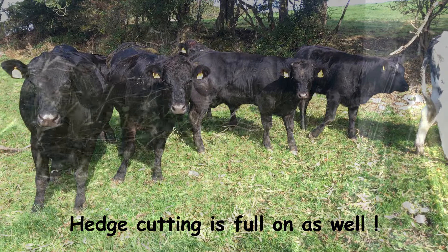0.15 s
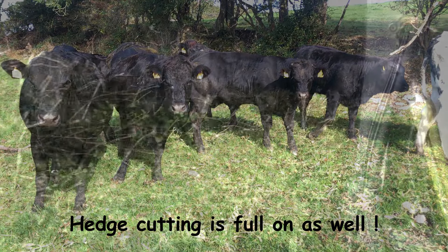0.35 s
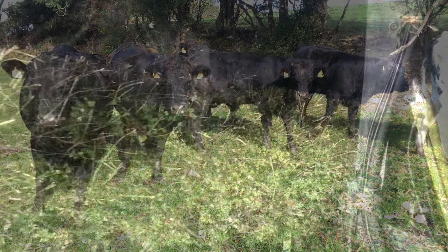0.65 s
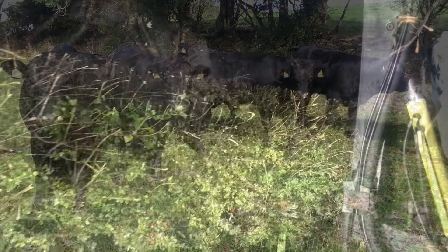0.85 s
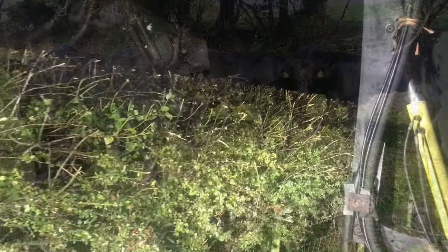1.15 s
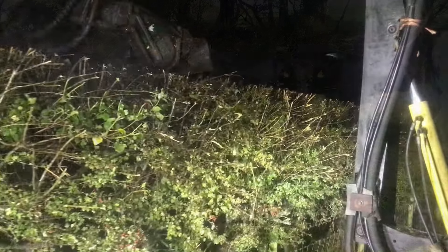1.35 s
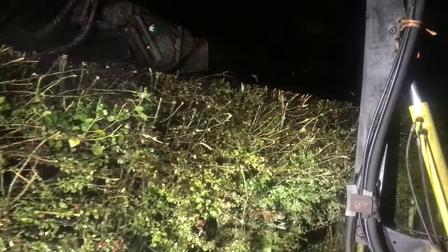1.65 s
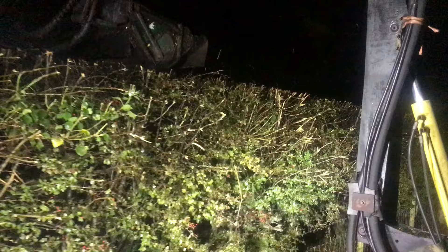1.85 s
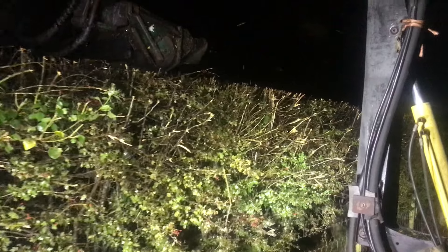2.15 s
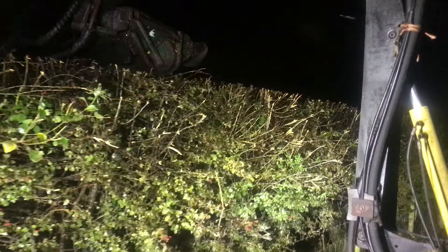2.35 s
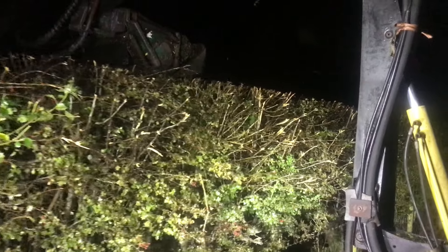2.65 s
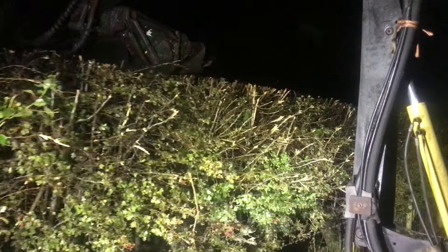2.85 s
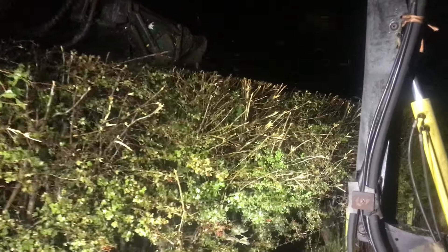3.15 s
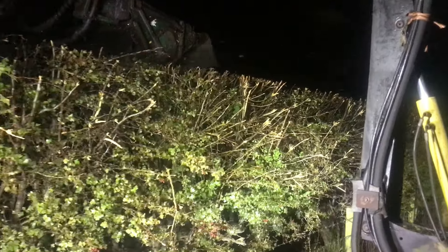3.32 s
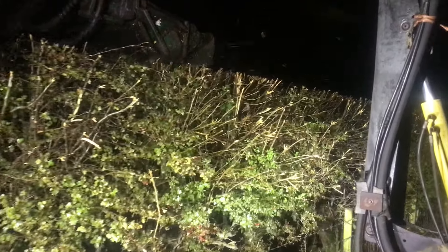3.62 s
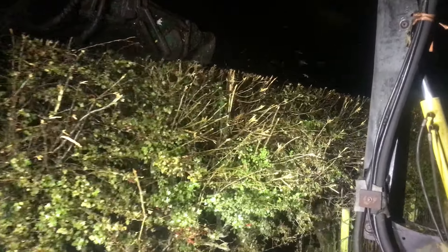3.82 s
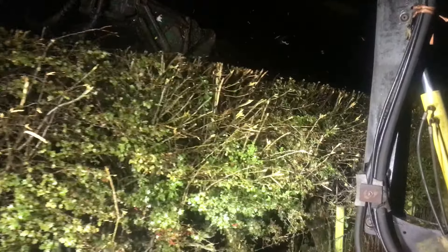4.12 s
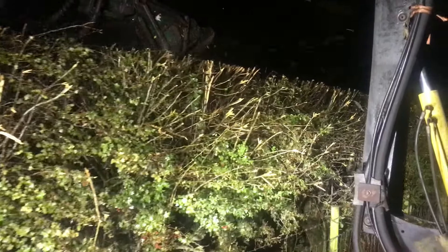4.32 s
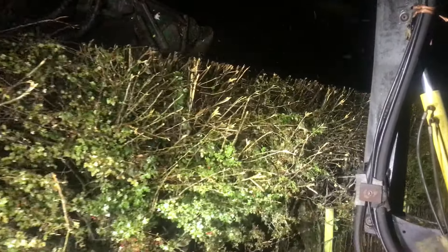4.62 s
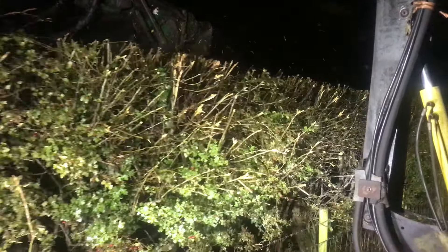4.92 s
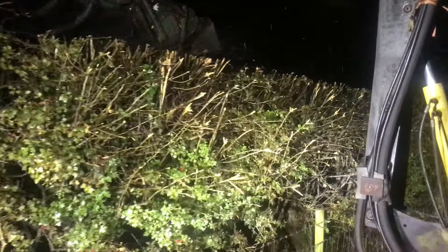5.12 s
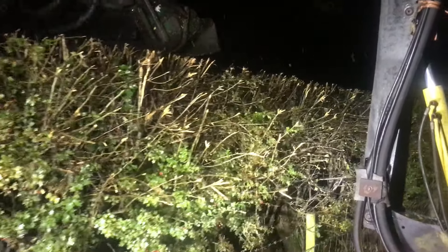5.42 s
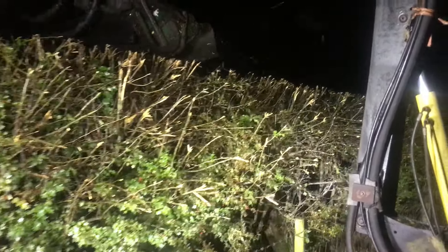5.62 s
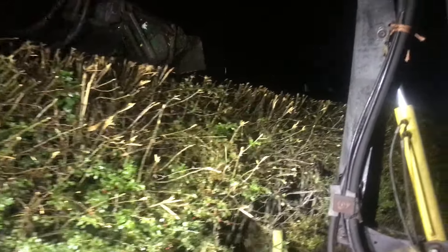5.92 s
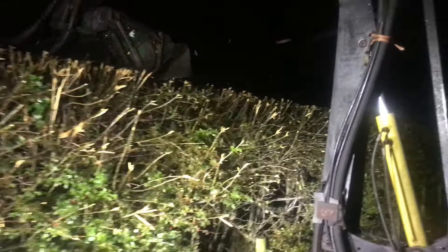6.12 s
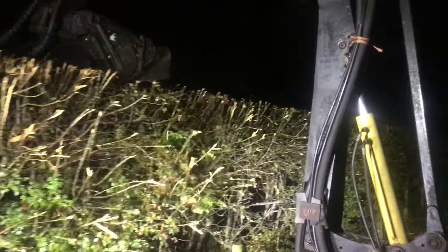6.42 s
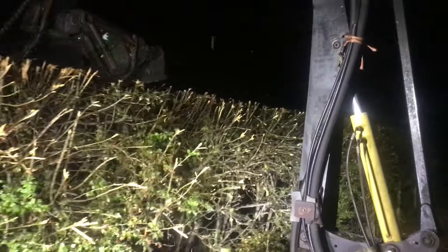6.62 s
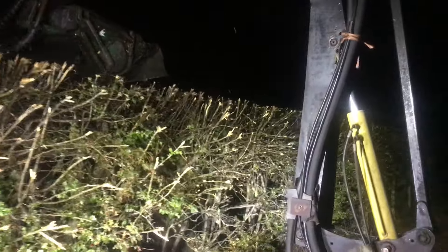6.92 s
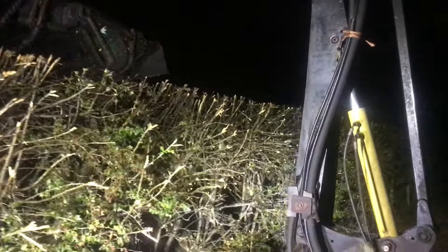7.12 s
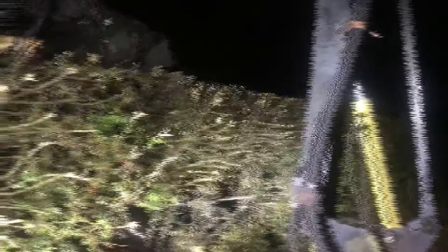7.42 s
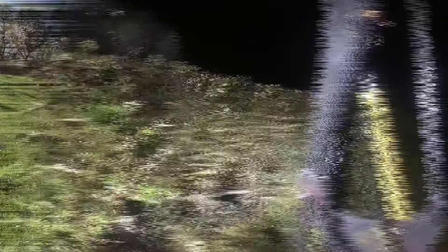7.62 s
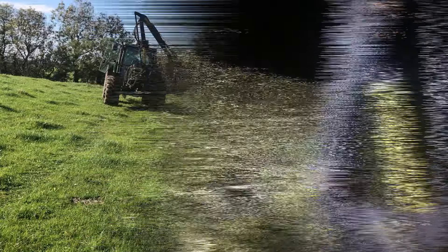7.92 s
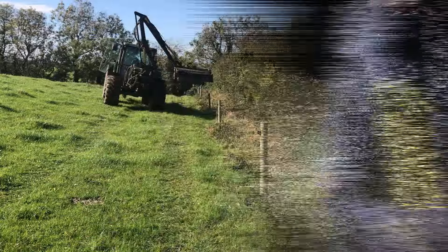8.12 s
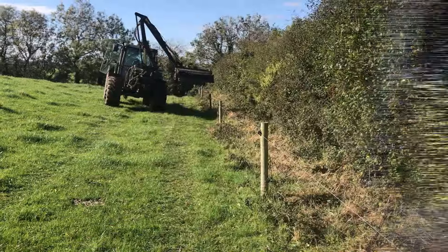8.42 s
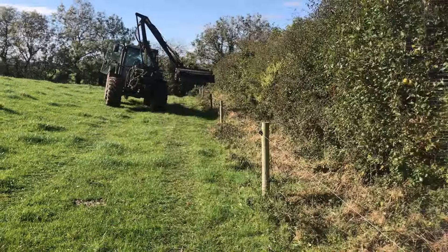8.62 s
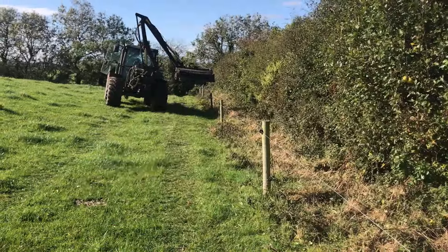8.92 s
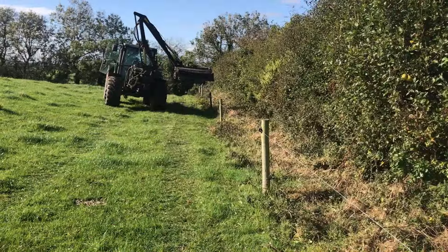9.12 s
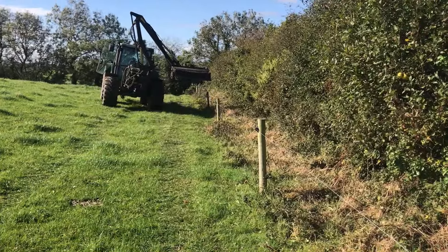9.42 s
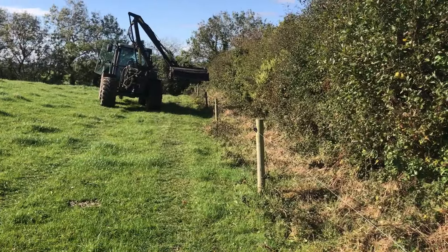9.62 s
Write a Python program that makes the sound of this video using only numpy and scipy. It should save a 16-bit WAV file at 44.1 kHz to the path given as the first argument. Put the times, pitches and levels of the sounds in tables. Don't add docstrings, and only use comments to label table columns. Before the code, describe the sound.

Beside a farm hedge, one microphone close to a working tractor: a deep, beating engine drone, with flail blades ripping through growth. Sparse snaps build into dense crunching and hard woody knocks, then ease to scattered snips. The close noise fades out and a softer, distant diesel takes over outdoors, a quick regular chug with dry clatter and small metallic taps.

```python
import sys
import numpy as np
from scipy import signal
from scipy.fft import rfft, irfft, next_fast_len
from scipy.io import wavfile
from scipy.ndimage import uniform_filter1d, map_coordinates

SR = 44100
rng = np.random.default_rng(int(sys.argv[2]) if len(sys.argv) > 2 else 0)


def int16_out(signal):
    q = np.round(np.clip(np.atleast_2d(signal).T, -1, 1) * 32767)
    wavfile.write(sys.argv[1], SR, q.astype(np.int16))


def rack_gain(trim_db):
    fader = np.asarray(trim_db, float)
    return 10 ** (fader / 20)


N = 430416
TIME = np.arange(N) / SR

# (time [s], low edge [Hz], high edge [Hz], level [dB])
STEREO_FLECKS = [
    (1.072, 5000, 14500, -66),
    (2.188, 6230, 7700, -60),
    (2.866, 11600, 14000, -47),
    (3.842, 7500, 11200, -44),
    (3.843, 4100, 5140, -47),
    (4.3, 10600, 14700, -48),
    (4.975, 6900, 8360, -46),
    (7.996, 13000, 15300, -75),
]
# (time [s], gain [ratio])
CAB_FADER = [(.62, 0.0079), (2.7, 0.88), (5.8, 1), (6.4, 0.77), (7.1, 0.6), (7.5, 0.37), (8.0, 0.18),
             (8.45, 0.069), (8.9, 0.025)]

# (time [s], level [dB])
FAR_LEVEL = [(7.3, -73), (7.8, -76), (8.2, -51), (8.4, -50), (8.7, -48), (9.0, -46), (9.4, -45.5),
             (9.76, -45.5)]
# (multiple of the firing rate [ratio], level [dB])
THUMP_ORDERS = [(1, 3), (2, 8), (3, 7), (4, -1), (5, 2), (6, 1.5), (7, 2), (8, -3)]
# (multiple of the firing rate [ratio], level [dB])
PIPE_ORDERS = [(9, 2.5), (10, 1), (11, 0), (12, -17), (13, -23), (14, 2), (15, -17), (16, -2), (18, -10),
               (20, -3)]
# (frequency [Hz], density [dB per Hz])
CLATTER_COLOUR = [(400, -50), (580, -14), (630, -11), (920, -15), (1550, -12.5), (2500, -21.5), (3000, -29),
                  (3900, -58)]
# (frequency [Hz], density [dB per Hz])
HISS_COLOUR = [(2000, -34), (2800, -17), (3300, -6), (4200, -11), (6000, -10.5), (9000, -15), (11000, -23),
               (13000, -45), (16000, -60)]
# (frequency [Hz], density [dB per Hz])
PANEL_COLOUR = [(40, -60), (100, -11), (150, -3.5), (310, -2), (390, -4), (450, -1.5), (560, -13),
                (700, -53)]
# (frequency [Hz], density [dB per Hz])
TOP_TREBLE_COLOUR = [(8000, -60), (10000, -4), (12000, 0), (13500, -5), (15500, -8), (17000, -60)]
# (frequency [Hz], width [Hz], level [dB])
BONNET_RESONANCES = [(1070, 20, 7.5), (1590, 83, 1.5), (2370, 200, 0.5), (3650, 100, 8.5), (4880, 280, 6)]
# (time [s], peak level [dB])
TAPPET_KNOCKS = [(8.4032, -40), (8.5888, -46), (8.7484, -35), (8.8761, -40), (8.938, -49), (9.0004, -50),
                 (9.0634, -47), (9.0946, -41), (9.3491, -37), (9.4429, -47), (9.5036, -42), (9.5321, -39),
                 (9.6264, -55), (9.6593, -46)]

# (time [s], level [dB])
SQUEAL_LEVEL = [(8.11, -91), (8.15, -72), (8.19, -84), (8.23, -86), (8.27, -86), (8.45, -94.5)]

# (time [s], firing rate [Hz])
FIRING_RATE = [(.9, 42.7), (1.5, 42.76), (1.8, 42.61), (2.1, 42.2), (2.7, 42.92), (3.0, 42.77),
               (3.45, 42.3), (3.9, 42.16), (4.5, 42.22), (5.25, 41.87), (5.7, 41.96), (6.3, 42.7),
               (6.6, 42.76), (6.9, 42.62), (7.5, 42.8), (8.4, 42.82)]
# (multiple of the firing rate [ratio], level over the drone [dB])
FIRING_ORDERS = [(3, -3.5), (4, -8.5), (5, -14.5), (10, -7.5), (11, -11.5), (12, -11.5), (13, -15.5),
                 (14, -16), (15, -24), (19, -24), (24, -29)]
# (multiple of the firing rate [ratio], level over the drone [dB])
UNEVEN_ORDERS = [(2.663, -16), (3.263, -10.5), (3.56, -25), (4.203, -12.5), (4.536, -14.5), (4.78, -24),
                 (5.67, -17), (10.33, -14), (6.56, -20), (3.766, -8), (28, -14)]
# (frequency [Hz], density [dB per Hz])
BLOCK_COLOUR = [(29, -29), (50, 1), (86, -9.5), (150, -0.5), (225, -6.5), (318, -9.5), (371, -11),
                (433, -6.5), (687, -12), (742, -14), (900, -13), (1220, -11.5), (1600, -18), (5000, -37),
                (6500, -63), (11000, -120)]
# (frequency [Hz], width [Hz], level [dB])
CAB_RESONANCES = [(287, 21, 4), (746, 23, 7), (1027, 19, 5.5), (1180, 95, 2.5), (1475, 17, 5.5),
                  (2120, 240, 3.5), (2245, 28, 5), (2890, 230, 4), (4110, 410, 2.5), (4960, 180, -5),
                  (5390, 200, 0.5), (6330, 160, 1), (7700, 170, -6), (9400, 400, 1), (10460, 150, -5.5)]
# (time [s], rotor share [0-1], engine load [dB])
ROTOR_BEATS = [(.83, 0.6, 0.5), (1.75, 0.2, -5.5), (2.25, 0.26, 3.5), (2.93, 0.1, 1.5), (3.46, 0.3, 1),
               (3.9, 0.26, -0.5), (4.36, 0.35, 0), (4.87, 0.24, 3), (5.5, 0.1, 2.5), (6.69, 0.54, -0.5),
               (7.65, 0, 2.5), (8.4, 0, -3), (9.5, .2, -4)]
# (time [s], loss [dB])
BOOM_JOLTS = [
    (1.13, 1),
    (2.87, 7),
    (3.01, 10),
    (5.38, 7),
    (5.58, 1),
    (5.79, 5),
]
# (time [s], second order level [dB], upper orders level [dB])
ENGINE_STRAIN = [(.8, -4, -1.5), (1.5, 2.5, -1), (2.0, -1, 0), (2.6, -11, -2.5), (3.0, -1, -0.5),
                 (3.6, 0, -2), (4.0, 0, 0), (4.5, 0.5, -0.5), (5.5, -1, -0.5), (6.4, 3.5, -2),
                 (7.0, -3, -1.5), (7.6, 5.5, -2), (8.2, -1, -1.5)]
# (time [s], pitch [Hz], level [dB])
PUMP_WHINE = [(.7, 748, -66), (1.1, 748, -55), (1.6, 745, -50), (2.1, 737, -48), (2.6, 745, -46),
              (2.95, 744, -45), (3.3, 733, -43), (3.65, 731, -44), (4.2, 740, -46), (4.7, 740, -46),
              (5.2, 738, -46), (5.7, 735, -47), (6.3, 742, -45), (7.0, 741, -45), (7.6, 744, -51),
              (8.3, 746, -61)]
# (time [s], level [dB])
PUMP_ORDER_LEVEL = [(.8, 0.5), (2.0, 3), (2.8, -4), (4.0, 0), (4.8, 1), (5.5, -10), (6.2, 0.5), (6.8, 0.5),
                    (8.0, -2)]

# (time [s], level at full fader [dB])
GROWTH_FEED = [(.62, -35.5), (.9, -43.5), (1.3, -42.5), (1.55, -47.5), (1.68, -47.5), (2.05, -46),
               (2.36, -48.5), (2.42, -41), (2.75, -42.5), (3.2, -39.5), (3.55, -31), (3.72, -36),
               (3.95, -36), (4.1, -40), (4.85, -38.5), (5.05, -40), (5.15, -54.5), (5.56, -42.5),
               (5.8, -51.5), (6.42, -51), (6.6, -48), (7.6, -46), (7.77, -47.5), (7.85, -55)]
# (time [s], half length [s], loss [dB])
GROWTH_GAPS = [
    (1.6, .03, 0.5),
    (1.705, .018, 8),
    (2.265, .035, 5),
    (3.748, .012, 4),
    (4.13, .025, 1),
    (4.32, 0.01, 1),
    (7.55, .012, 6),
    (7.728, .012, 4),
]
# (time [s], peak level [dB], stalk crack [dB])
STALK_BITES = [(0.9981, -44, -11), (1.0939, -39, -7), (1.1922, -37, -17), (1.289, -35, -14),
               (1.3259, -31.5, -16), (1.4292, -31, -19), (1.4775, -39, -17), (1.652, -39, -11),
               (1.727, -33.5, -15), (1.8502, -34, -19), (1.8961, -35, -15), (1.9555, -35, -11),
               (2.0014, -34, -15), (2.025, -32, -11), (2.118, -34, -11), (2.371, -33, -11),
               (2.3846, -22, -14), (2.4818, -24.5, -11), (2.5177, -29.5, 0), (2.7164, -31, -6),
               (2.7634, -28, 2), (2.8504, -35, -11), (2.9003, -21, -18), (2.9472, -22, 2),
               (3.1614, -23, -7), (3.2415, -19, -18), (3.3712, -20, -12), (3.4194, -18, -13),
               (3.4466, -14, -23), (3.4954, -21, -11), (3.8484, -28, 6), (3.8834, -22, -3),
               (4.1754, -22, -6), (4.4234, -27, -11)]
# (time [s], peak level [dB], stalk crack [dB])
SHOOT_SNIPS = [(4.6524, -26, -16), (5.0554, -27, -9), (5.1053, -27.5, 1), (5.279, -27.5, -7),
               (5.3514, -35, 0), (5.3991, -36, -6), (5.5104, -22.5, -17), (5.8634, -38, -10),
               (5.9299, -30, -6), (5.9854, -33.5, -10), (6.1345, -31, -16), (6.2282, -30, -6),
               (6.312, -26.5, -1), (6.345, -31, -6), (6.392, -31, 1), (6.463, -37, -10), (6.4754, -40, -11),
               (6.5784, -32, -6), (6.6544, -29.5, -16), (7.0414, -31, -14), (7.1077, -32, -13),
               (7.166, -35, -12), (7.1746, -27, -20), (7.2154, -31, -20), (7.3274, -37, -6),
               (7.3714, -38, 3), (7.4304, -36, 0), (7.5004, -40, 2), (7.5637, -37, -10), (7.6011, -34, -21),
               (7.6715, -38, -7), (7.694, -41, -10), (7.7393, -49, -14), (8.0441, -47, -10),
               (5.425, -32, -1), (5.452, -33, -2)]
# (time [s], half length [s], level [dB])
THICK_BRANCHES = [(1.283, .06, -53), (1.716, 0.077, -50), (2.458, 0.06, -35.5), (2.728, 0.042, -31),
                  (2.814, 0.021, -27), (2.858, 0.034, -24), (2.935, 0.05, -23), (3.065, 0.088, -27),
                  (3.297, 0.054, -28), (3.39, 0.025, -27.5), (3.484, 0.044, -23.5), (3.78, 0.019, -27),
                  (3.859, 0.016, -23), (4.108, 0.013, -29), (4.227, 0.04, -31.5), (4.435, 0.019, -26.5),
                  (4.48, 0.022, -26), (4.573, 0.058, -26.5), (4.69, 0.045, -28), (4.773, 0.044, -26),
                  (4.866, 0.057, -25.5), (4.94, 0.039, -30.5), (5.28, 0.38, -44), (5.628, 0.039, -35.5),
                  (5.883, 0.016, -31.5), (6.305, .1, -55), (6.483, 0.018, -32), (7.186, .04, -43)]
# (time [s], half length [s], level [dB])
LEAFY_BUNCHES = [(0.813, 0.028, -56), (3.267, 0.019, -39), (5.71, 0.056, -48), (6.844, 0.13, -68),
                 (7.23, 0.037, -42.5), (7.294, 0.044, -51), (7.43, 0.041, -49), (8.075, .025, -63.5),
                 (8.51, 0.027, -72), (8.605, 0.073, -61.5), (8.72, .03, -72)]
# (time [s], half length [s], level [dB])
STALK_MASSES = [
    (2.896, 0.064, -37),
    (4.688, 0.045, -38.5),
    (4.774, 0.055, -43),
    (4.89, 0.059, -38),
    (7.2, .04, -54),
    (7.36, 0.11, -48),
    (8.6, .07, -67),
]
# (time [s], level [dB], ring pitch [Hz])
WOOD_BLOWS = [(2.2449, -39, 1210.0), (2.3333, -32, 980), (2.3846, -34, 1400), (2.5193, -36, 1130.0),
              (2.5582, -38, 1110.0), (2.599, -31, 1130.0), (2.622, -24, 1120), (2.8527, -21, 2500.0),
              (2.8755, -22.0, 2180), (2.954, -21, 1590.0), (3.0301, -33, 1250.0), (3.244, -28, 1210.0),
              (3.387, -39, 1200.0), (3.4192, -22, 4100.0), (3.4695, -19, 2940), (3.4746, -26, 1490),
              (3.485, -24, 1050), (3.496, -30, 1120), (3.775, -41, 2060.0), (3.8127, -26.0, 1010),
              (3.8482, -34, 2960), (3.8603, -28, 990.0), (3.8981, -30, 4150.0), (3.948, -26, 3000),
              (4.01, -31.0, 3000.0), (4.0234, -45, 1040.0), (4.1775, -34, 5560), (4.3067, -26, 1247),
              (4.3471, -35, 2270.0), (4.439, -18, 1020), (4.51, -22, 1210), (4.7263, -27, 2290),
              (4.846, -19, 3070), (4.853, -39, 2200), (5.0206, -26, 1484), (5.0655, -34, 1070.0),
              (5.1084, -26, 1630), (5.2151, -31, 1170.0), (5.4067, -25, 1390), (5.744, -28, 1160.0),
              (5.841, -31, 1130.0), (6.311, -34, 1210), (6.4762, -23, 1260.0), (5.279, -33, 4100),
              (6.3125, -39, 5800), (6.347, -40, 4000), (6.3935, -34, 3700), (6.4765, -31, 3500),
              (6.483, -35, 2500)]
# (frequency [Hz], density [dB per Hz])
SPRAY_COLOUR = [(1470, -11.5), (2500, -8), (4240, -7), (4910, -4.5), (8580, -6.5), (10600, -8), (15000, -9),
                (15600, -8)]
# (frequency [Hz], density [dB per Hz])
STALK_COLOUR = [(1500, -40), (2600, -5.5), (3500, 4.5), (6000, 1), (8000, -2), (11000, -40)]
# (frequency [Hz], density [dB per Hz])
WOOD_COLOUR = [(470, -19), (800, -0.5), (1020, 0.5), (1730, -4.5), (2200, -1.5), (2570, -8), (2910, -5.5),
               (4940, -8.5), (8000, -18.5), (10400, -48), (17600, -120)]
# (frequency [Hz], density [dB per Hz])
THUD_COLOUR = [(40, -62), (70, -4), (98, -2), (130, -22), (300, -12), (500, -34.5)]


def unit(x):
    return x / np.sqrt(np.mean(x ** 2) + 1e-20)


def curves(rows):
    s, *cols = np.transpose(rows)
    return [np.interp(TIME, s, c) for c in cols]


def swells(rows):
    return sum(h * np.exp(-((TIME - s) / w) ** 2) for s, w, h in rows)


def wobble(rate):
    return map_coordinates(rng.standard_normal(int(N * rate / SR) + 4), [TIME * rate], order=1)


def coloured(x, spectrum, bumps):
    size = next_fast_len(N + 8192)
    hz = np.fft.rfftfreq(size, 1 / SR)
    f, db = np.transpose(spectrum)
    shape_db = np.interp(np.log(hz + 1), np.log(f + 1), db)
    shape_db += sum(b / (1 + ((hz - c) / w) ** 2) for c, w, b in bumps)
    return unit(irfft(rfft(x, size) * rack_gain(shape_db), size)[:N])


def orders(table, turns, unsteady_db, slip, lag, saw):
    sound = np.zeros(N)
    for k, db in table:
        level = np.sqrt(2) * rack_gain(db + unsteady_db * wobble(5))
        wander = slip * np.sqrt(k) * wobble(7)
        sound -= level * np.cos(2 * np.pi * k * turns - saw * np.pi / 2 - lag * k * k + wander)
    return sound


def gated(turns, depth_db, sharp, scatter):
    cycle = np.floor(turns + .5).astype(int)
    first = cycle[0]
    strength = 1 + scatter * rng.standard_normal(cycle[-1] - first + 1)[cycle - first]
    swell = (.5 + .5 * np.cos(2 * np.pi * turns)) ** sharp
    return rack_gain(depth_db * strength * swell) * rng.standard_normal(N)


def chips(scatter_db, ring_db, patch_db):
    strength = rack_gain(scatter_db * (wobble(900) + 0.95 * wobble(60)))
    z = signal.stft(strength * rng.standard_normal(N), nperseg=1024)[2]
    rings = uniform_filter1d(rng.standard_normal(z.shape), size=4, axis=1)
    patches = uniform_filter1d(rng.standard_normal(z.shape), size=50, axis=0)
    patches = uniform_filter1d(patches, size=3, axis=1)
    z = z * rack_gain(ring_db * unit(rings) + patch_db * unit(patches))
    return signal.istft(z, nperseg=1024)[1][:N]


def stereo_flecks():
    side, window = np.zeros(N), signal.windows.tukey(1500, .5)
    for s, low_hz, high_hz, db in STEREO_FLECKS:
        bandpass = signal.butter(6, [low_hz, high_hz], "bandpass", fs=SR, output="sos")
        band = signal.sosfilt(bandpass, rng.standard_normal(len(window)))
        side[round(s * SR) - len(window) // 2:][:len(window)] += rack_gain(db) * unit(band) * window
    return side


def tappet():
    sound, t = np.zeros(N), np.arange(SR // 20) / SR
    for s, db in TAPPET_KNOCKS:
        envelope = rack_gain(db - 4.5 - 60 * t / 0.061) * (1 - np.exp(-t / 0.00093))
        ring = envelope * np.sin(2 * np.pi * rng.normal(1567, 50) * t)
        start = round(s * SR)
        sound[start:][:len(t)] += ring[:N - start]
    return sound


def far_engine():
    idle_hz, first_thump_s = 31.86, 8.7548
    turns = (TIME - first_thump_s) * idle_hz
    thumps = orders(THUMP_ORDERS, turns, unsteady_db=.7, slip=.05, lag=.027, saw=0)
    thumps += orders(PIPE_ORDERS, turns - .16, unsteady_db=1.5, slip=.07, lag=0, saw=-1.36)
    clatter = gated(turns + .09, depth_db=5.8, sharp=1.6, scatter=.1)
    hiss = gated(turns + 0.17, depth_db=3.5, sharp=1.5, scatter=.2)
    panels = gated(turns - .05, depth_db=3, sharp=1.5, scatter=.1)
    top_treble = chips(scatter_db=0, ring_db=0, patch_db=9)
    mix = unit(thumps)
    mix += rack_gain(-1.6) * coloured(panels, PANEL_COLOUR, [])
    mix += rack_gain(-5.0) * coloured(clatter, CLATTER_COLOUR, BONNET_RESONANCES)
    mix += rack_gain(-43.0) * coloured(top_treble, TOP_TREBLE_COLOUR, [])
    mix += rack_gain(-20.5 + 0.78 * wobble(8.2)) * coloured(hiss, HISS_COLOUR, BONNET_RESONANCES)
    return rack_gain(curves(FAR_LEVEL)[0]) * mix * (TIME > 7.2) + tappet()


def squeak():
    level = rack_gain(curves(SQUEAL_LEVEL)[0] + 3 * wobble(60))
    tone = np.sin(2 * np.pi * 10150 * TIME + .8 * wobble(150))
    return level * tone * (TIME > 8.1) * (TIME < 8.5)


def cab_boom(turns):
    beats = np.interp(TIME, [row[0] for row in ROTOR_BEATS], np.arange(len(ROTOR_BEATS)))
    share, load_db = curves(ROTOR_BEATS)
    beating = rack_gain(load_db) * abs(1 - share * np.exp(2j * np.pi * beats))
    choke_db = swells([(s, 0.039, loss_db) for s, loss_db in BOOM_JOLTS])
    tone = orders([(0.99, 0)], turns, unsteady_db=2.5, slip=.05, lag=0, saw=0.9)
    return rack_gain(-30 - choke_db) * beating * tone


def pump_whine():
    pump_hz, pump_db = curves(PUMP_WHINE)
    tone = orders([(1, 0)], np.cumsum(pump_hz) / SR, unsteady_db=2, slip=.9, lag=0, saw=0)
    return rack_gain(pump_db - 3) * tone * np.clip((8.5 - TIME) / .3, 0, 1)


def near_engine():
    drone_db = -33.5
    turns = np.cumsum(curves(FIRING_RATE)[0]) / SR
    second_db, upper_db = curves(ENGINE_STRAIN)
    upper = orders(FIRING_ORDERS + UNEVEN_ORDERS, turns, unsteady_db=1.0, slip=.045, lag=.04, saw=1)
    second = orders([(2, -5.5)], turns, unsteady_db=1.2, slip=.06, lag=.04, saw=1)
    pump_order = orders([(7.577, -11)], turns, unsteady_db=1, slip=.04, lag=0, saw=0)
    tones = rack_gain(drone_db + upper_db) * upper + rack_gain(drone_db + second_db) * second
    tones += rack_gain(drone_db + curves(PUMP_ORDER_LEVEL)[0]) * pump_order
    block = coloured(gated(turns, depth_db=0, sharp=1.5, scatter=0.68), BLOCK_COLOUR, CAB_RESONANCES)
    block *= rack_gain(drone_db + 2.0 + 0.68 * wobble(8))
    return (cab_boom(turns) + tones + block) * curves(CAB_FADER)[0] + pump_whine()


def chops():
    sound, t = np.zeros(N), np.arange(SR // 25) / SR
    for s, db, hz in WOOD_BLOWS:
        ring = np.sin(2 * np.pi * hz * t) + 0.41 * rng.standard_normal(len(t))
        envelope = rack_gain(db + 0.5 - 60 * t / 0.024) * (1 - np.exp(-t / 0.00037))
        sound[round(s * SR):][:len(t)] += envelope * ring
    return sound


def flail():
    feed = rack_gain(curves(GROWTH_FEED)[0] - swells(GROWTH_GAPS)) * curves(CAB_FADER)[0]
    branch = swells([(s, w, rack_gain(db)) for s, w, db in THICK_BRANCHES])
    leaves = swells([(s, w, rack_gain(db)) for s, w, db in LEAFY_BUNCHES])
    crack = swells([(s, w, rack_gain(db)) for s, w, db in STALK_MASSES])
    wood = np.hypot(rack_gain(5) * feed, branch)
    spray = np.hypot(feed * rack_gain(4.5), rack_gain(-12) * branch) * rack_gain(0.58 * wobble(25)) + leaves
    t = np.arange(SR // 4) / SR
    rise = (1 - np.exp(-t / .0015)) ** 2
    for rows, t60_s in ((STALK_BITES, 0.12), (SHOOT_SNIPS, 0.14)):
        burst = rise * rack_gain(-60 * t / t60_s)
        for s, db, crack_db in rows:
            start = round(s * SR)
            at = slice(start, start + len(t))
            spray[at] = np.hypot(spray[at], rack_gain(db - 6.0) * burst)
            crack[at] = np.hypot(crack[at], rack_gain(db + crack_db - 6.5) * burst)
    twigs = coloured(chips(scatter_db=1.0, ring_db=3.0, patch_db=0.5), SPRAY_COLOUR, CAB_RESONANCES)
    stalks = coloured(chips(scatter_db=-3.5, ring_db=3.2, patch_db=1.0), STALK_COLOUR, CAB_RESONANCES)
    grind = coloured(chips(scatter_db=1.7, ring_db=2.4, patch_db=.8), WOOD_COLOUR, CAB_RESONANCES)
    thud = coloured(rng.standard_normal(N), THUD_COLOUR, [])
    sound = spray * twigs + crack * stalks
    sound += wood * rack_gain(-4.5 + 0.25 * wobble(33)) * grind
    sound += wood * rack_gain(-7.0) * thud + chops()
    return sound * np.clip((8.9 - TIME) / .15, 0, 1)


def scene():
    cab_view = (near_engine() + flail() + squeak()) * (TIME > .621)
    return cab_view + far_engine() + np.outer([1, -1], stereo_flecks())


def roll_off(x):
    return signal.sosfilt(signal.butter(12, 15750, fs=SR, output="sos"), x)


def record(dry):
    limit = signal.ellip(10, .1, 70, 15750, fs=SR, output="sos")
    return roll_off(signal.sosfilt(limit, dry))


dry = scene()
out = record(dry)
int16_out(out)
```